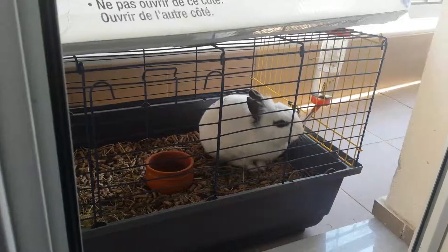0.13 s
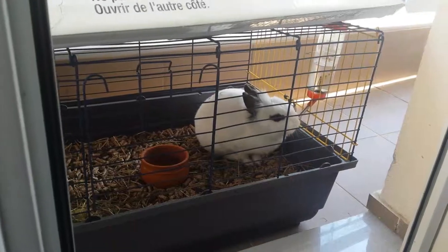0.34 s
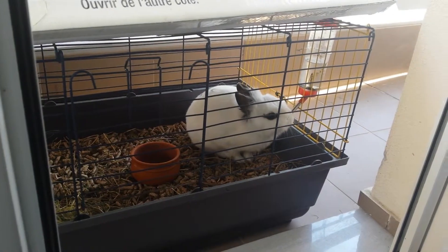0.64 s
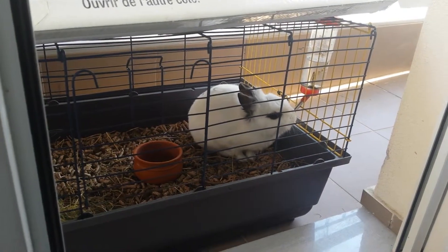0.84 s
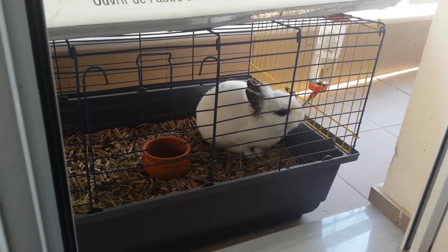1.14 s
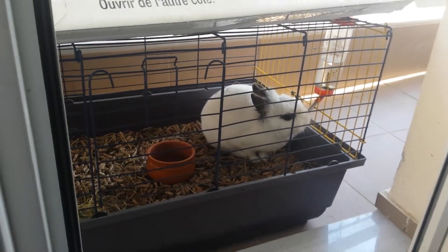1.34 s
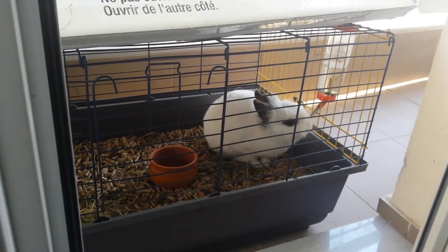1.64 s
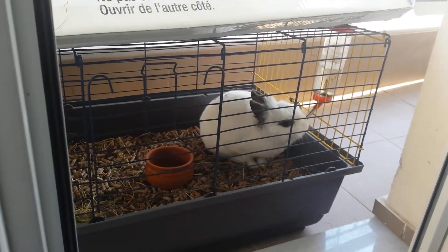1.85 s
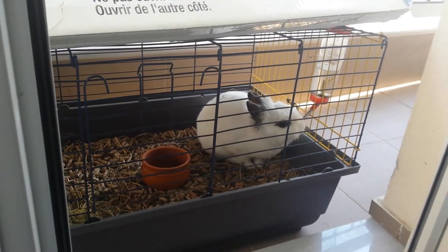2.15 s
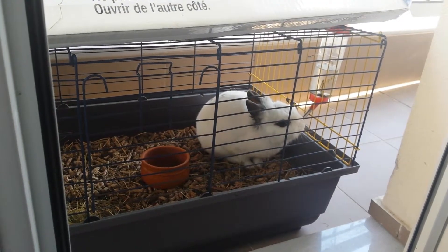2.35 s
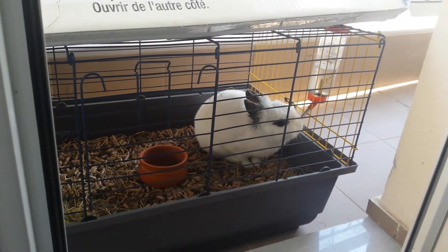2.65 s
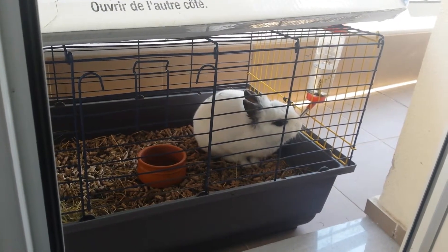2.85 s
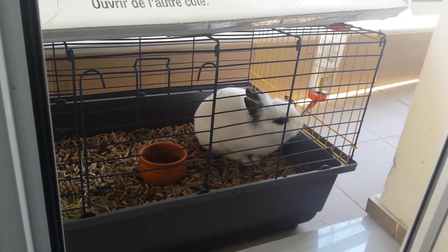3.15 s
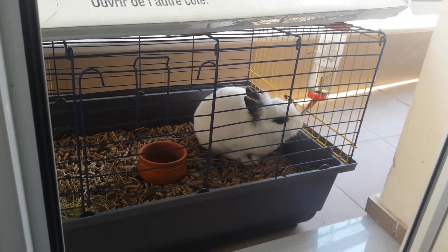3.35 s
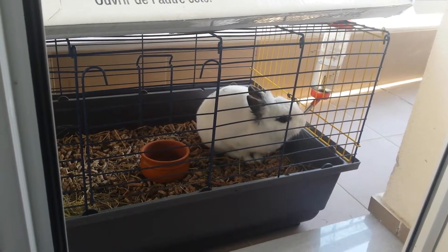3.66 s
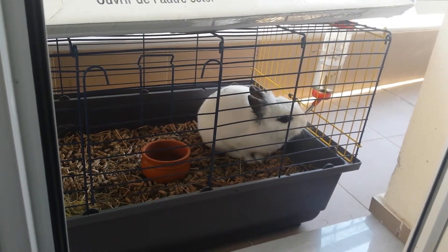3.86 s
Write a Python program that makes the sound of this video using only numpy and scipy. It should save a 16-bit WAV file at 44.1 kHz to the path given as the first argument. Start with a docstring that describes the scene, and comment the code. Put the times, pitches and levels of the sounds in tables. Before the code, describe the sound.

A rabbit drinks from a cage bottle, each lick making a sharp metallic click in the spout. The clicks start sparse, then come quickly and steadily, close by on the right, over faint distant traffic rumble and hiss.

```python
"""A rabbit drinks from a bottle on its wire cage. Each lick knocks the steel ball in the spout with a
bright click; about 30 ms later the ball often drops back with a duller one, cushioned by water.
Faint wet ticks of the mouth lie between. Close walls answer briefly; distant traffic rumbles behind,
and the microphones hiss, mostly on the right."""
import sys
import numpy as np
from scipy import signal
from scipy.fft import rfft, irfft, next_fast_len
from scipy.io import wavfile
from scipy.ndimage import map_coordinates

SR = 44100
rng = np.random.default_rng(int(sys.argv[2]) if len(sys.argv) > 2 else 0)


def transcribe(u):
    """Save the signal u as a 16-bit wav file named by the first command-line argument.

    u: samples, shape (n,) or (channels, n), limited to [-1, 1]; the rate is SR.
    q: integer samples, one column per channel.
    """
    v = np.clip(np.atleast_2d(u).T, -1, 1)
    q = np.round(v * 32767).astype(np.int16)
    wavfile.write(sys.argv[1], SR, q)


N = 176400


def amp(db):
    """Decibels to gain."""
    return 10 ** (np.asarray(db) / 20)


def unit(x):
    """Scale to rms 1."""
    return x / np.sqrt(np.mean(x ** 2) + 1e-20)


def along(points, hz):
    """Read (freq_hz, value) points on a log axis."""
    freqs, values = np.transpose(points)
    return np.interp(np.log(hz + 1), np.log(freqs + 1), values)


def automation(rows):
    """One value per sample from (time_s, value) rows."""
    return np.interp(np.arange(N) / SR, *np.transpose(rows))


def wobble(rate):
    """A smooth random curve, rate knots a second."""
    return map_coordinates(rng.standard_normal(1000), [np.arange(N) * rate / SR], mode="wrap")


def tone(hz, waver_hz, rate):
    """A wavering sine of rms 1."""
    return np.sqrt(2) * np.sin(2 * np.pi * np.cumsum(hz + waver_hz * wobble(rate)) / SR)


def filtered(x, response):
    """Filter x by a gain that depends on frequency."""
    n = x.shape[-1]
    size = next_fast_len(n + 4096)
    return irfft(rfft(x, size) * response(np.fft.rfftfreq(size, 1 / SR)), size)[..., :n]


def eq(x, points, depth=1, top_hz=np.inf):
    """Apply a (freq_hz, gain_db) curve, scaled by depth and cut off at top_hz."""
    return filtered(x, lambda hz: amp(depth * along(points, hz)) * (hz < top_hz))


def panned(x, balance):
    """Pan each frequency by a balance curve, keeping the channels' mean gain."""
    def gains(hz):
        ratio = amp(along(balance, hz))
        return 2 * np.array([ratio, np.ones_like(ratio)]) / (1 + ratio)
    return filtered(x, gains)


def add(track, start_s, sound):
    """Mix a sound into the track."""
    part = track[:, round(start_s * SR):][:, :sound.shape[-1]]
    part += sound[..., :part.shape[1]]


# Colour of each microphone's hiss: freq_hz, gain_db
HISS_LEFT_EQ = [(1500, -40), (2800, -16), (3300, -1.5), (5000, -4), (6700, -3), (8500, -8.5), (14000, -9.5)]
HISS_RIGHT_EQ = [(1500, -81), (2800, -10), (3300, -10.5), (5200, -11.5), (5900, -9.5), (6500, -1.5),
                 (7000, 0.5), (7800, -6), (9000, -13.5), (11300, -21), (14000, -21)]

def hiss():
    """Steady noise floor of two microphones, the right one louder."""
    left = unit(eq(rng.standard_normal(N), HISS_LEFT_EQ, top_hz=14500))
    right = unit(eq(rng.standard_normal(N), HISS_RIGHT_EQ, top_hz=14500))
    return np.array([amp(-61.5) * left, amp(-50) * right])


# Colour of the traffic bed: freq_hz, gain_db
TRAFFIC_EQ = [(15, -29), (28, -20), (36, -14), (48, -17.5), (60, -8.5), (80, -5), (100, -3), (125, 1),
              (150, -4), (175, -7.5), (200, -9), (225, -7), (275, -15.5), (330, -10), (360, -16),
              (390, -13.5), (460, -19), (525, -16.5), (590, -20), (720, -17), (860, -15.5), (1260, -21.5),
              (1430, -21), (1720, -25.5), (2200, -23.5), (3000, -31), (3900, -47.5), (6600, -100)]
# Its stereo image, 1 being mono: freq_hz, correlation
TRAFFIC_IMAGE = [(100, 0.98), (200, 0.98), (350, 0.81), (700, 0.76), (1200, 0.38), (2000, 0.051),
                 (3000, 0.18)]
# Its pan: freq_hz, left_minus_right_db
TRAFFIC_PAN = [(100, -1.86), (350, -0.6), (700, -0.5), (1400, -5), (3000, -3.5)]
# Slow swell above the bass: time_s, gain_db
TRAFFIC_SWELL = [(.7, 1.5), (1.2, 2), (1.6, 1), (2.1, 1), (2.6, 0), (3.2, -.7), (3.6, 0), (4, -0.5)]
# Fader ride of a far engine, loudest early on: time_s, level_db
ENGINE_RIDE = [(.4, -39), (.5, -38.5), (.62, -43), (.87, -44.5), (1.0, -62), (2.1, -56), (2.27, -48),
               (2.45, -62), (3.2, -63), (3.37, -47.5), (3.5, -63), (4, -55)]
# Hums within the traffic: pitch_hz, level_db
TRAFFIC_HUMS = [(47.8, -58), (224, -68), (328, -66), (387, -68), (522, -73.5), (730, -72.5), (1163, -75.5),
                (1459, -74.5)]

def traffic():
    """Distant rumble, nearly mono in the bass, with an engine note and faint hums."""
    def mid_side_gains(hz):
        width = np.arccos(np.clip(along(TRAFFIC_IMAGE, hz), -1, 1)) / 2
        return amp(along(TRAFFIC_EQ, hz)) * np.array([np.cos(width), np.sin(width)])
    mid, side = filtered(rng.standard_normal((2, N)), mid_side_gains)
    bed = unit(np.array([mid + side, mid - side])) * amp(-44.5)
    bass = filtered(bed, lambda hz: 1 / (1 + (hz / 250) ** 4))
    swell_db = automation(TRAFFIC_SWELL)
    rumble = bass + (bed - bass) * amp(swell_db - swell_db.mean())
    engine = tone(hz=148.9, waver_hz=1.33, rate=12) * amp(automation(ENGINE_RIDE) - 2)
    hums = sum(tone(pitch_hz, waver_hz=5.88, rate=25) * amp(level_db - 2 + 3.2 * wobble(5.04))
               for pitch_hz, level_db in TRAFFIC_HUMS)
    return panned(rumble + engine + hums, TRAFFIC_PAN)


# Reverb time of the close walls: freq_hz, t60_s
WALL_DECAY = [(300, 0.47), (4000, 0.13), (7000, 0.18), (13000, 0.049)]

def with_walls(dry, wet_db=-7.5, build_s=0.0052):
    """A sound and the walls' short answer, each frequency dying at its own speed."""
    hz, t, noise = signal.stft(rng.standard_normal((2, SR // 3)), SR, nperseg=256)
    decay = amp(-60 * t / along(WALL_DECAY, hz)[:, None])
    tail = signal.istft(noise * decay * (1 - np.exp(-t / build_s)), SR, nperseg=256)[1]
    wet = signal.fftconvolve(dry, tail / np.linalg.norm(tail[0]), axes=1)
    return dry + amp(wet_db) * wet[:, :dry.shape[1]]


# Ringing modes of the spout: pitch_hz, level_db, t60_s
SPOUT_MODES = [(4134, -6, .022), (4340, -1, 0.029), (4590, -8, .022), (4700, -7, .022), (5806, -13, 0.024),
               (6082, -5, 0.036), (6460, 2.5, 0.054), (6790, 2, 0.054), (6930, -1, .05), (7570, -2, 0.067),
               (7430, -5, 0.038), (8060, -8, 0.038), (8820, 1.5, 0.024), (12200, -5, 0.022),
               (12920, -5, .02)]

def contact(grain, colour, attack_s, rattle_t60_s, ring_db, shared=0.51):
    """One hit in the spout: a dense, short rattle, partly the same grain each time, and the tube's ring."""
    t = np.arange(grain.shape[1]) / SR
    noise = np.sqrt(shared) * grain + np.sqrt(1 - shared) * rng.standard_normal(grain.shape)
    rattle = unit(eq(noise, colour)) * amp(-60 * t / rattle_t60_s)
    ring = 0
    for pitch_hz, level_db, t60_s in SPOUT_MODES:
        envelope = amp(level_db + rng.normal(0, 2.4) - 60 * t / t60_s)
        cycles = pitch_hz * rng.normal(1, 0.0018) * t + rng.random((2, 1))
        ring += envelope * np.sin(2 * np.pi * cycles)
    return (rattle + amp(ring_db) * ring) * (1 - np.exp(-t / attack_s))


# Mouth ticks and one spit of water: start_s, level_db
MOUTH_TICKS = [(.511, -46), (.650, -49), (.772, -43.5), (0.835, -40), (.881, -39.5), (0.948, -34.5),
               (1.01, -39), (1.043, -37.5), (1.057, -37.5), (1.136, -41), (1.485, -47), (2.094, -40),
               (2.762, -40), (3.825, -39.5)]
WATER_SPIT = (3.1294, -28)
# Colour of each: freq_hz, gain_db
TICK_EQ = [(300, -35), (2200, -18), (3100, -3), (3700, -11), (4300, 6), (5200, -13), (7000, -2),
           (10000, -13), (15000, -38)]
SPIT_EQ = [(1000, -35), (5000, -22), (6500, -2), (8000, 3), (8900, -3), (9700, -18), (14000, -34)]

def mouth(grain):
    """Faint wet ticks of the mouth on the spout, and a short bright spit of water inside it."""
    out = np.zeros((2, N))
    for start_s, level_db in MOUTH_TICKS:
        tick = contact(grain, TICK_EQ, attack_s=0.0007, rattle_t60_s=0.027, ring_db=-17)
        add(out, start_s, amp(level_db - 5) * with_walls(tick))
    start_s, level_db = WATER_SPIT
    spit = contact(grain, SPIT_EQ, attack_s=0.00043, rattle_t60_s=0.016, ring_db=-32)
    add(out, start_s, amp(level_db - 3.5) * with_walls(spit))
    return out


# The ball lands on its seat: start_s, level_db, low_ring_db
BALL_DROPS = [(1.7944, -29.5, -13), (1.9765, -27, -12.5), (2.153, -31, -7.5), (2.3288, -33.5, -7.5),
              (2.5591, -37.5, -7), (2.9341, -31.5, -13.5), (3.1092, -30.5, -8.5), (3.2859, -27.5, -11.5),
              (3.462, -28.5, -8.5), (3.6401, -31, -9.5)]
# Colour of the landing's rattle: freq_hz, gain_db
DROP_EQ = [(300, -36), (1500, -16), (2400, -10.5), (3000, -4.5), (3700, -11.5), (4300, 3), (5100, -7.5),
           (6000, -5.5), (7000, 1.5), (8600, -8), (10000, -13.5), (12000, -21), (15500, -28)]

def ball_drops(grain, usual_low_db=-10.5, cushion_hz=9700):
    """The ball falls back with a duller click: water in the tube damps it above cushion_hz."""
    out = np.zeros((2, N))
    for start_s, level_db, low_ring_db in BALL_DROPS:
        click = contact(grain, DROP_EQ, attack_s=0.0005, rattle_t60_s=0.043, ring_db=-15)
        tint = [(4500, low_ring_db - usual_low_db), (6000, 0)]
        add(out, start_s, amp(level_db - 5.5) * with_walls(eq(click, tint, depth=0.62)))
    return filtered(out, lambda hz: 1 / np.sqrt(1 + (hz / cushion_hz) ** 8))


# The tongue knocks the ball: start_s, level_db, low_ring_db, top_db
LICK_HITS = [(0.672, -23.5, -11, -29), (1.2219, -29, -14, -24), (1.346, -26.5, -13, -23),
             (1.593, -31.5, -15, -26), (1.7686, -26, -8, -24.5), (1.946, -23.5, -18, -18),
             (2.123, -24, -13.5, -32), (2.2965, -28.5, -13.5, -22), (2.5231, -27.5, -10, -22),
             (2.7161, -25, -12.5, -25), (3.0724, -29.5, -11, -27), (3.255, -26.5, -17, -21),
             (3.4307, -24.5, -13, -24), (3.6018, -24.5, -18, -27)]
# Colour of a lick's rattle and of its opening snap: freq_hz, gain_db
LICK_EQ = [(300, -14), (1500, -18), (3000, -9.5), (3700, -10.5), (4300, -2.5), (5100, -9.5), (6000, -8),
           (7000, -1.5), (8000, -6.5), (8600, -6), (9400, -15), (11300, -19), (12300, -15), (12800, -14),
           (13400, -11), (15500, -39)]
SNAP_EQ = [(500, -8), (2000, 0), (3300, -14), (4300, 2), (5200, 5), (7000, 6), (10000, -0.5), (13000, -8),
           (15500, 1)]

def licks(grain, usual_low_db=-14.5, usual_top_db=-20.5, snap_t60_s=0.0095):
    """Bright knocks of the steel ball, each with a sharp snap and tinted by how the tongue lands."""
    out = np.zeros((2, N))
    t = np.arange(grain.shape[1]) / SR
    for start_s, level_db, low_ring_db, top_db in LICK_HITS:
        body = contact(grain, LICK_EQ, attack_s=0.00044, rattle_t60_s=0.03, ring_db=-10)
        snap = unit(eq(rng.standard_normal(body.shape), SNAP_EQ)) * amp(-60 * t / snap_t60_s)
        click = body + amp(-1) * snap
        tint = [(3300, 0), (4300, low_ring_db - usual_low_db), (6000, 0),
                (9000, 0), (12000, top_db - usual_top_db)]
        add(out, start_s, amp(level_db - 7.5) * with_walls(eq(click, tint, depth=0.62)))
    return out


# Pan of the spout: freq_hz, left_minus_right_db
SPOUT_PAN = [(500, 0), (2000, -9.5), (3300, 3), (4400, -7.5), (5500, -13), (7000, -13.5), (10000, -10),
             (13000, -13)]

def scene():
    """The spout to the right, over traffic and hiss."""
    grain = rng.standard_normal((2, SR // 3))  # noise common to every contact
    spout = licks(grain) + ball_drops(grain) + mouth(grain)
    return panned(spout, SPOUT_PAN) + traffic() + hiss()


# Master fade-in: time_s, gain_db
FADE_IN = [(.39, -80), (.415, -49), (.436, -19.5), (.5, -10), (.58, -5), (.67, 0.5)]
# Master treble roll-off: freq_hz, gain_db
MASTER_EQ = [(14400, 0), (14900, -17), (15600, -20)]

def record(dry):
    """The mix fades in from silence and loses its highest treble."""
    return eq(dry * amp(automation(FADE_IN)), MASTER_EQ, top_hz=15600)


dry = scene()
out = record(dry)
transcribe(out)
```